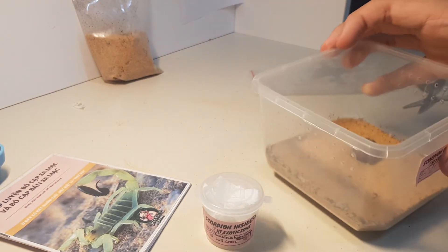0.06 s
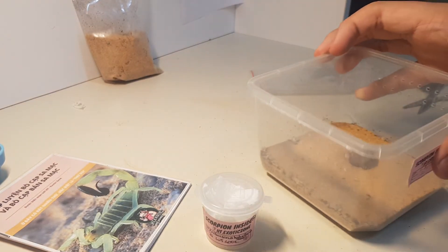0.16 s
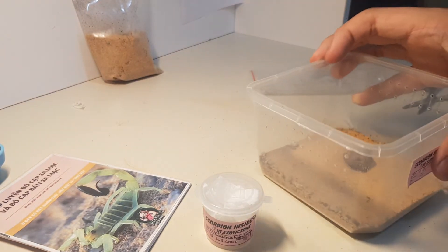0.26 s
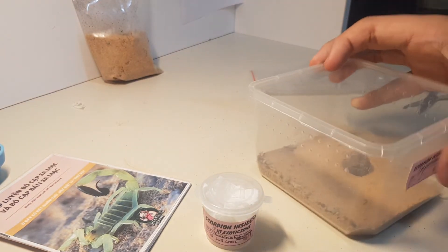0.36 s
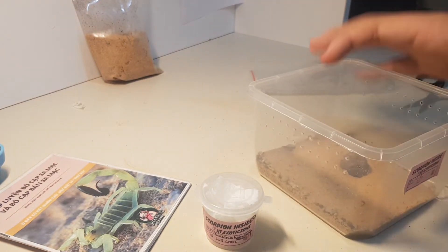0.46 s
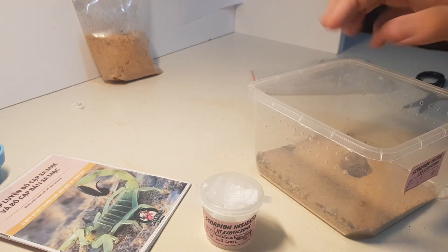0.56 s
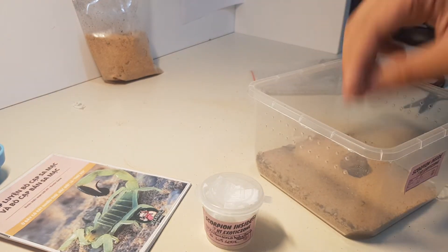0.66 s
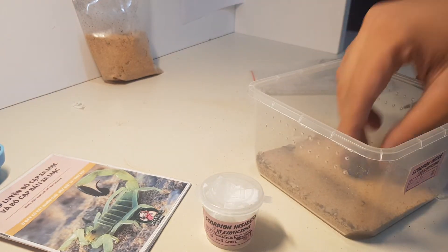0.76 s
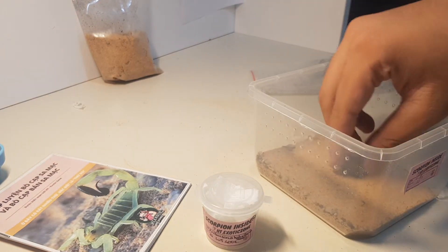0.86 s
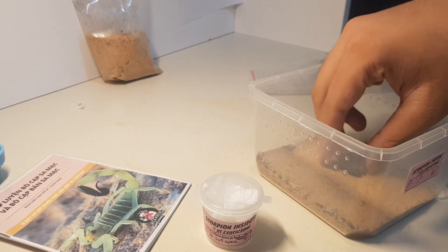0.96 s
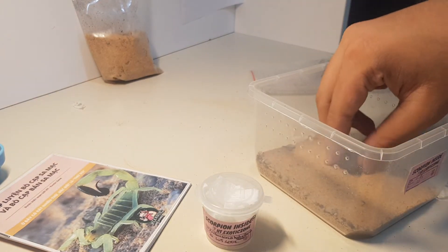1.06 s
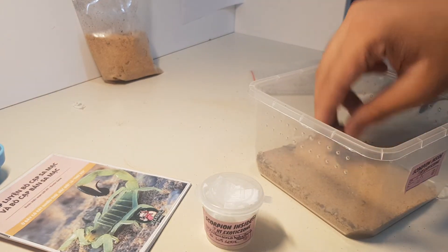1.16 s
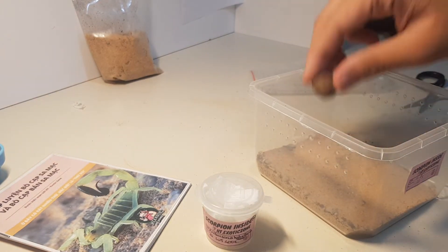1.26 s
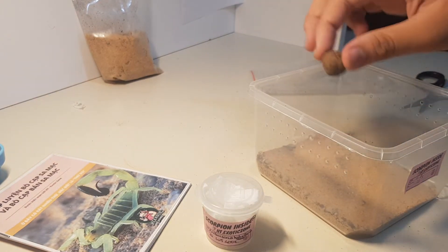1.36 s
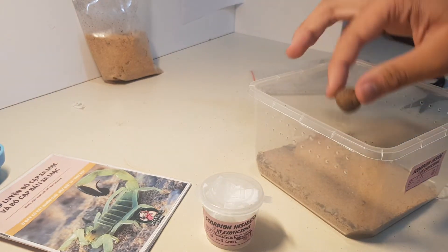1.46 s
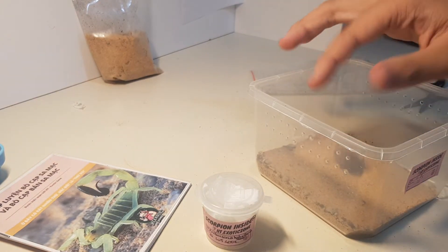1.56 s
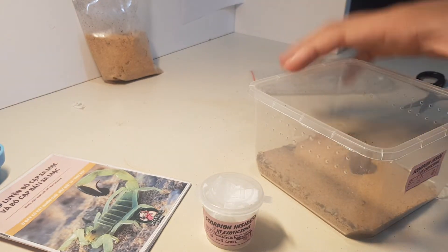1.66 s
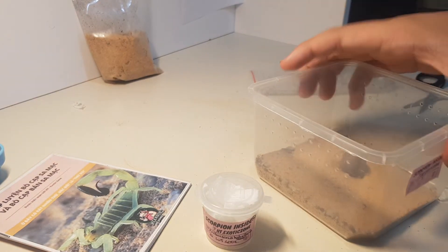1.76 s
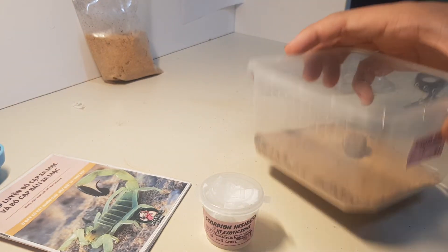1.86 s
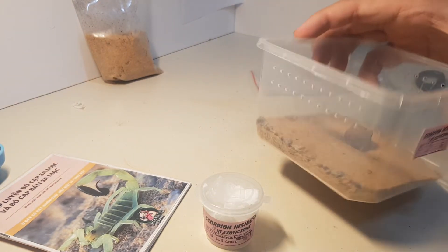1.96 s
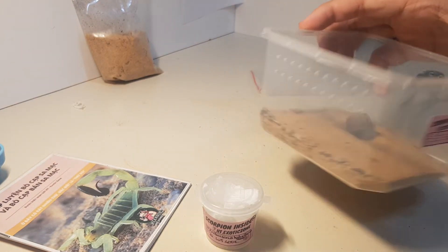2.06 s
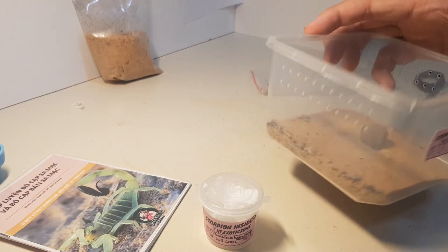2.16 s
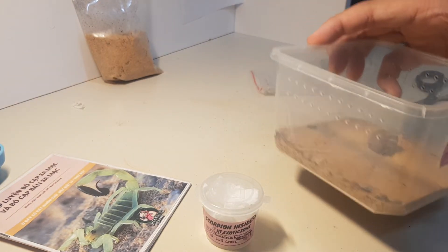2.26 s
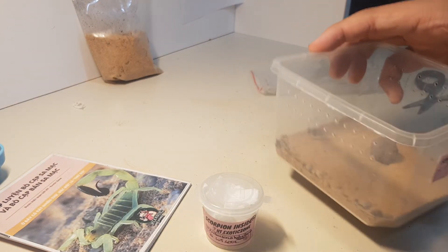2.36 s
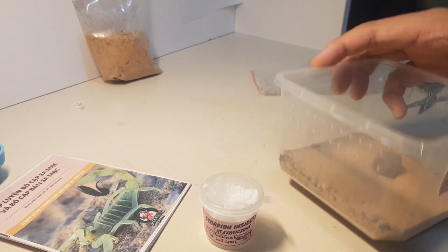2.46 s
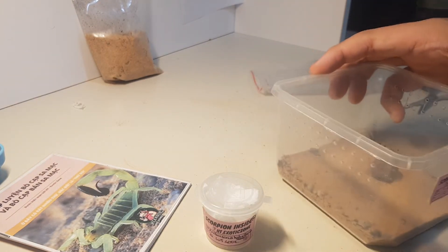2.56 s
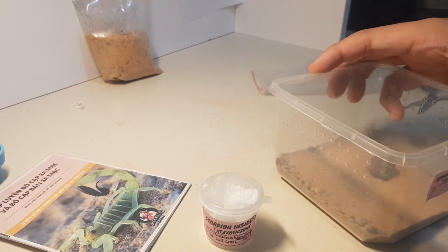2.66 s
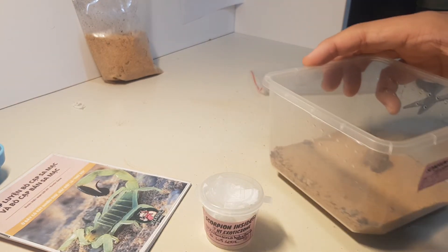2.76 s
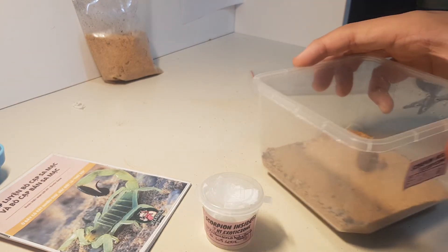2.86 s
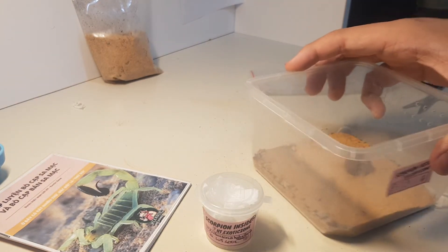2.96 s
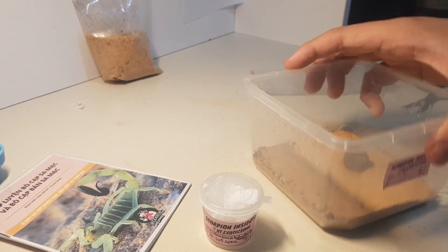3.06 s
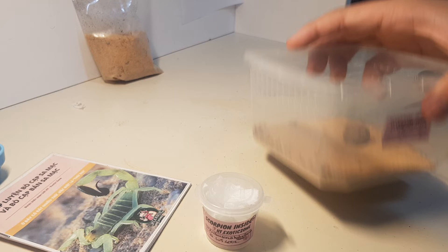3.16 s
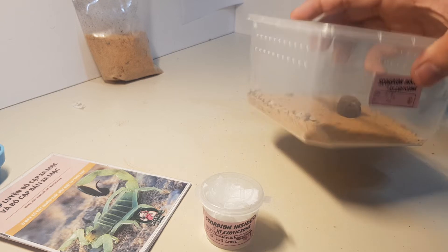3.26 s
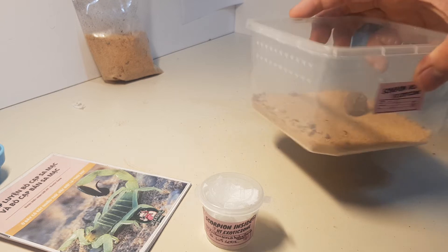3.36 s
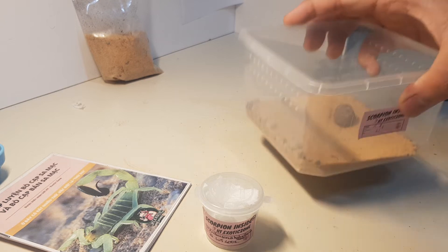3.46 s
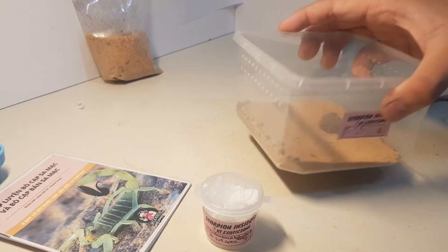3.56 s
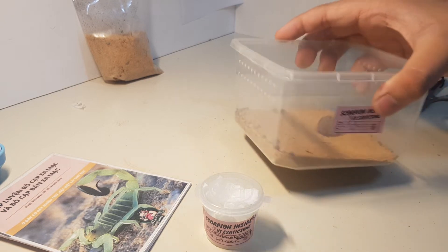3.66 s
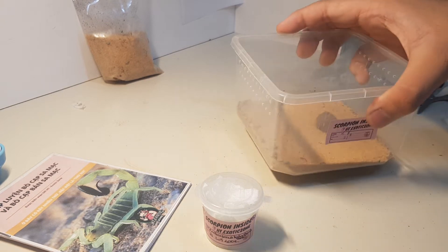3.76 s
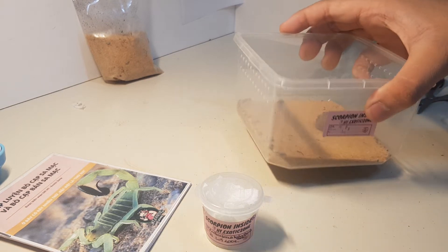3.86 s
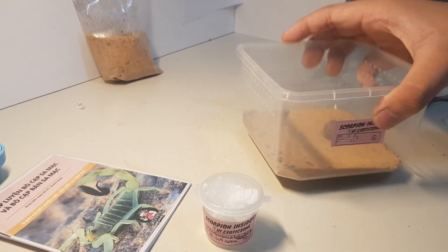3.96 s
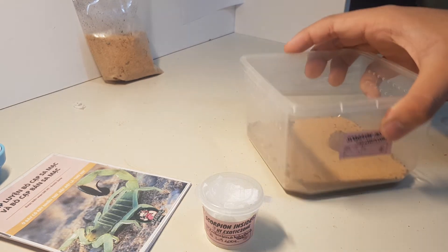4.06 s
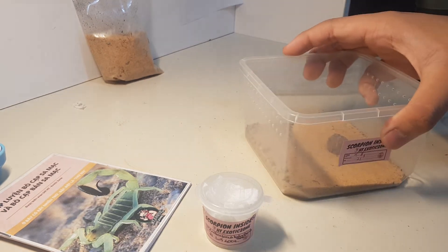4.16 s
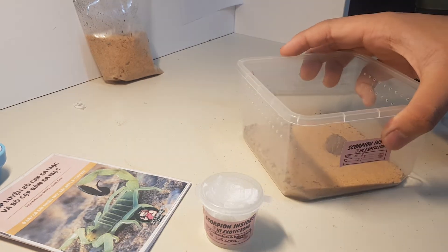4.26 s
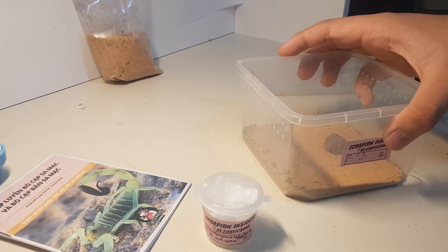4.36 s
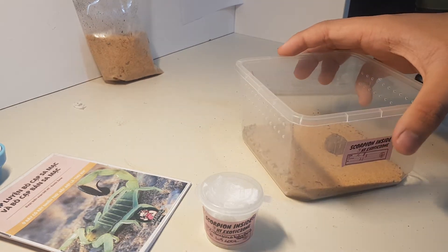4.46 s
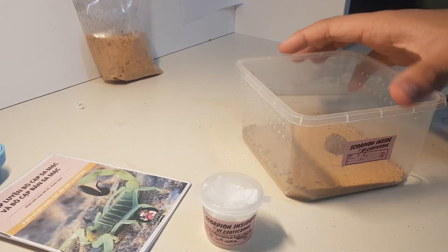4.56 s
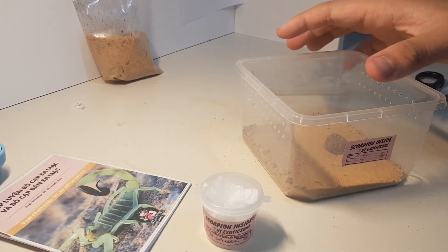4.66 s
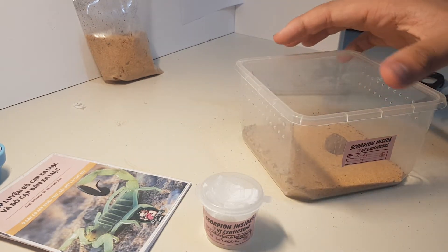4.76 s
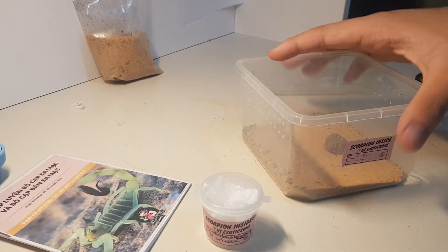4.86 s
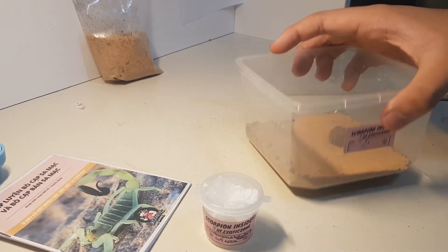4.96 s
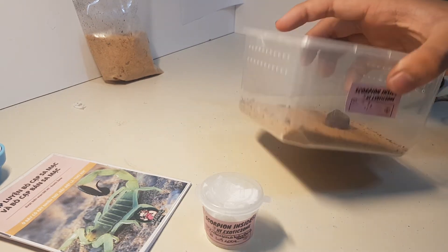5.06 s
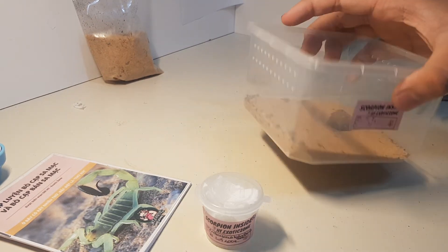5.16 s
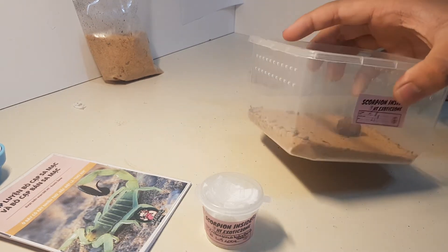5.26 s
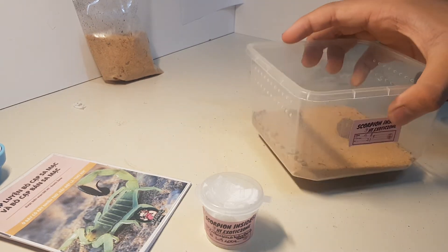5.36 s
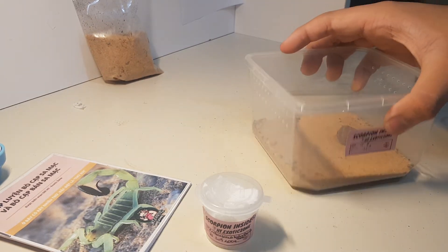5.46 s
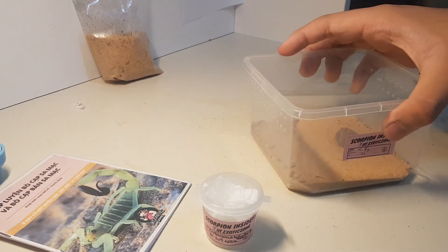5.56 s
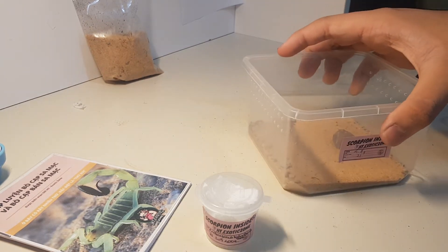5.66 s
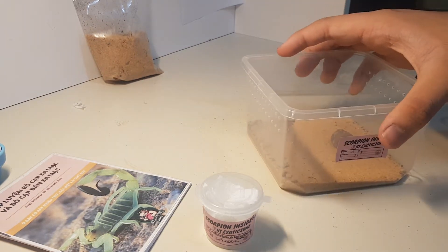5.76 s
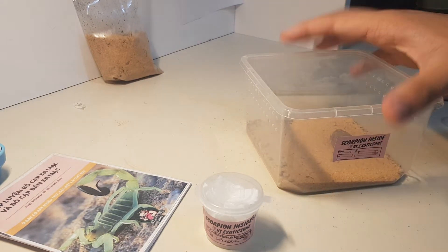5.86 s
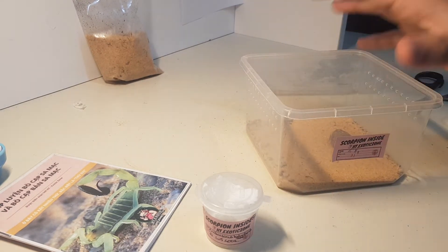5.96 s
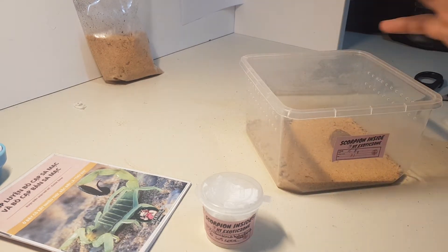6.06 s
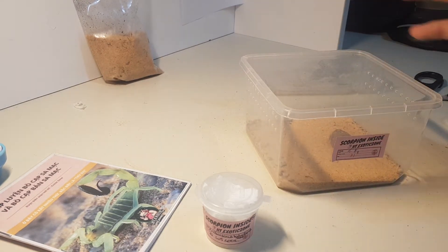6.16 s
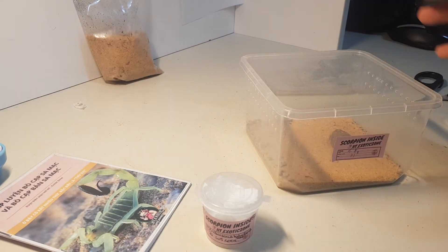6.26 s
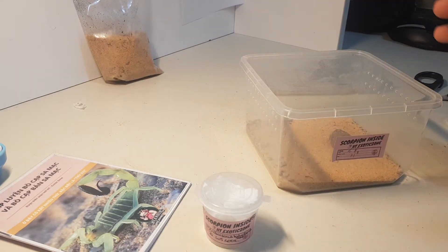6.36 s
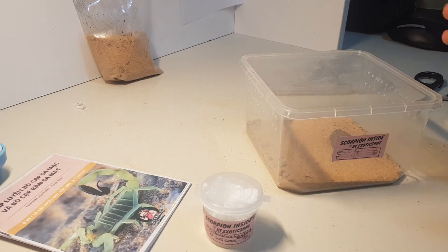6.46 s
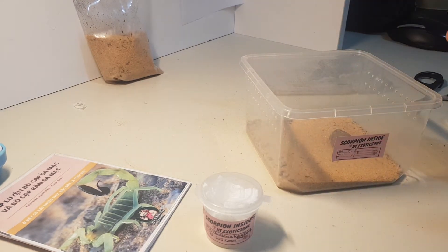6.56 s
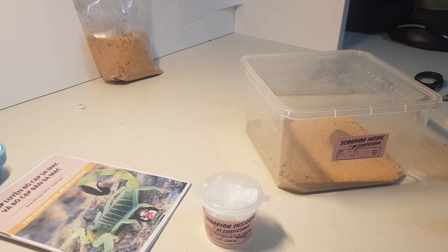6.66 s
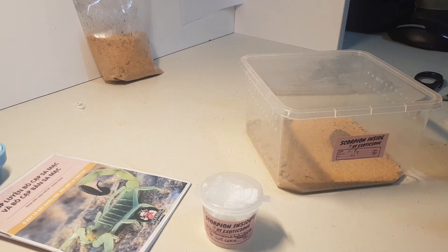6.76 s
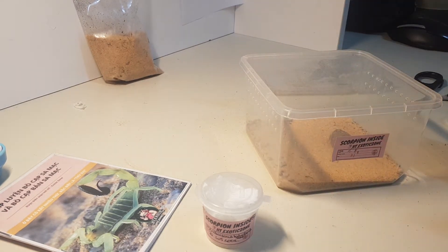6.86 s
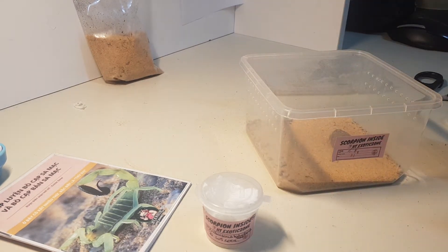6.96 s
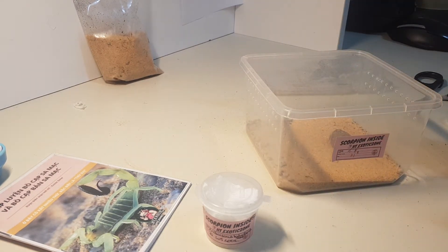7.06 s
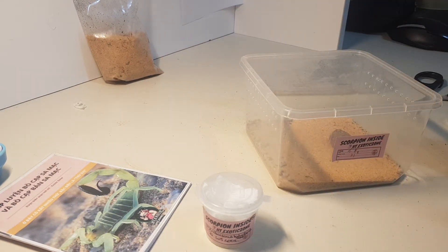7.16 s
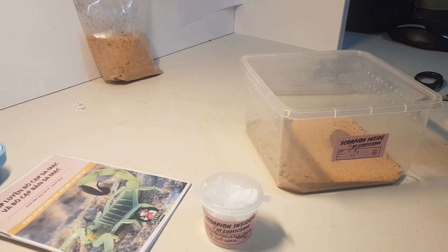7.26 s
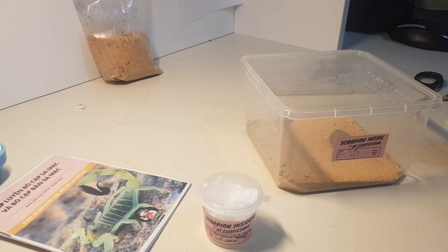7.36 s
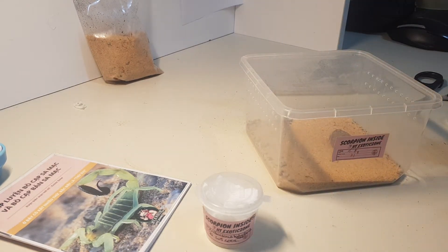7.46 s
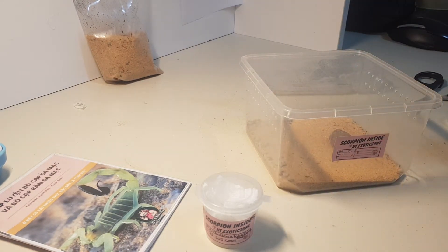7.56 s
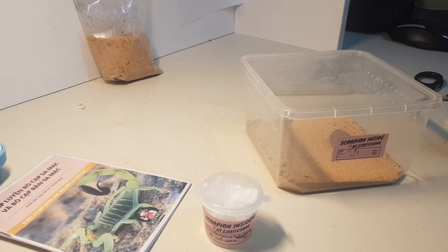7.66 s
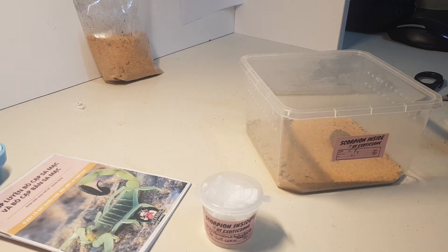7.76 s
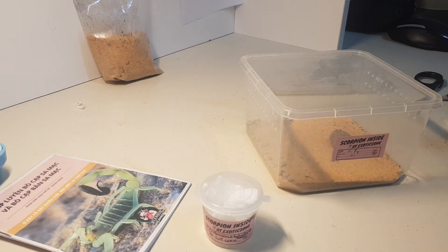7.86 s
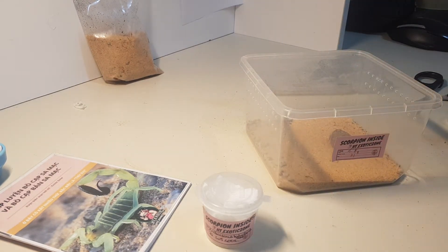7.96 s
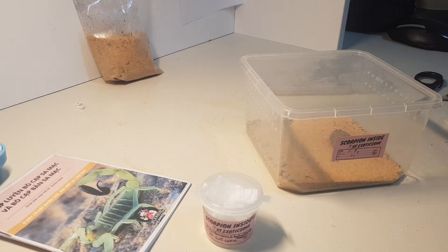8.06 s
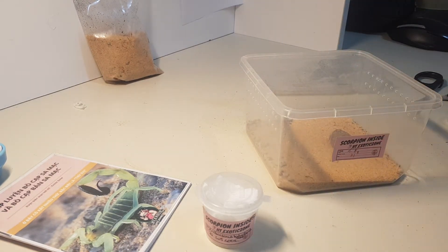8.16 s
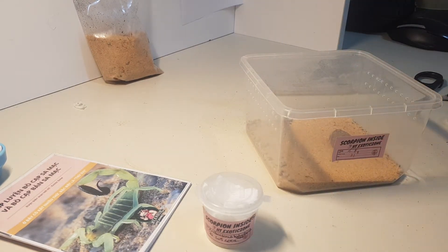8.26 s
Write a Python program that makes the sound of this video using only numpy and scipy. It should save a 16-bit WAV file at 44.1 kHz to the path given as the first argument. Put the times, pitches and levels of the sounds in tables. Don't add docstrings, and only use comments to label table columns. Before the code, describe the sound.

Small dry room, close stereo microphone. Thin plastic walls knock hollowly against a table, first in a quick cluster, then in lighter bumps with fingernail ticks, short scrapes and soft grains shifting. The sharpest double-edged clack lands late, trailed by crackly ticks. Only faint taps remain near the end, while low electrical hum, wavering fan tones and soft air noise carry on.

```python
import sys
import numpy as np
from scipy import signal
from scipy.fft import rfft, irfft, next_fast_len
from scipy.io import wavfile
from scipy.ndimage import uniform_filter1d

SR = 44100
rng = np.random.default_rng(int(sys.argv[2]) if len(sys.argv) > 2 else 0)


def materialize(psi):
    bounded = np.clip(np.atleast_2d(psi).T, -1, 1)
    quanta = np.round(bounded * 32767).astype(np.int16)
    wavfile.write(sys.argv[1], SR, quanta)


def decibels_to_gain(level_db):
    exponent = np.asarray(level_db, float) / 20
    return 10 ** exponent


N = 366459
TIME = np.arange(N) / SR
RING_TIME = TIME[:5000]
SIZE = next_fast_len(N)
BINS = np.fft.rfftfreq(SIZE, 1 / SR) + 1e-3

# pitch_hz, level_db, t60_s,
# part (rounded: 0 base, 1 worktop, 2 long wall, 3 short wall, 4 rim)
MODES = [(146, -4.5, 0.077, 0.5), (173, 0.5, 0.071, 1), (204.3, 1.5, 0.061, 1), (251, -1, 0.055, 3.5),
         (299, -5, 0.047, 2), (357.5, 2, 0.056, 1.5), (403, -1.5, 0.04, 2), (546, -3, 0.065, 3),
         (600, -3, 0.047, 2.5), (748, -5.5, 0.035, 0), (794, -3, 0.035, 0), (897, 0, 0.031, 0),
         (980, -3, 0.031, -0.5), (1074, -7.5, 0.028, 0.5), (1260, -4, 0.017, 4), (1600, -4.5, 0.017, 4),
         (1875, -3.5, 0.022, 4), (2080, -4.5, 0.016, 4), (2426, -5, 0.014, 4), (2770, -9, 0.0087, 4),
         (3120, -9, 0.014, 4), (3620, -11, 0.012, 4)]
# pitch_hz, density_db (per Hz)
SAND_BODY = [(710, -42), (1200, -4.5), (2950, -5.5), (3560, -7.5), (4300, -6), (6140, -6), (7900, -14.5),
             (10300, -69), (17400, -120)]
# pitch_hz, density_db (per Hz)
SAND_BRIGHT = [(4650, -22), (7900, -22), (8530, -14), (9000, -7), (12400, 1), (15000, -13), (16000, -20)]
# pitch_hz, likeness (0-1)
EAR_LIKENESS = [(60, 0.8), (190, .98), (290, 0.7), (640, 0.33), (1410, 0.16), (3100, 0.29), (6820, 0.12),
                (15000, 1)]


def rms_one(x):
    return x / np.sqrt(np.mean(x ** 2) + 1e-20)


def in_time(rows):
    s, *columns = np.transpose(rows)
    return [np.interp(TIME, s, c) for c in columns]


def at_hz(points, hz):
    pitch_hz, value = np.transpose(points)
    return np.interp(np.log(hz), np.log(pitch_hz), value)


def drift(rate):
    knots = int(N / SR * rate * 2) + 2
    wander = np.interp(TIME * rate * 2, np.arange(knots), rng.standard_normal(knots))
    return rms_one(uniform_filter1d(wander, int(SR / rate / 2)))


def ring(t, hz, t60):
    t = np.maximum(t, 0)
    swell = (1 - np.exp(-4 * hz * t)) ** 2
    decay = decibels_to_gain(-60 * t / np.maximum(t60, .003))
    return np.sin(2 * np.pi * hz * t) * decay * swell


def two_ears(pair, colour_db, likeness):
    # pitch_hz, left_minus_right_db
    lean = [(60, -3), (110, -1.5), (200, -1), (380, -3.5), (700, -4.5), (1290, -5.5), (2380, -4.5),
            (4400, -6), (8120, -.5), (15000, -.5)]
    mid, side = rfft(pair, SIZE) * decibels_to_gain(colour_db)
    alike = np.clip(likeness, 0, 1)
    ears = np.sqrt(1 + alike) * mid + np.sqrt(1 - alike) * side * [[1], [-1]]
    balance = decibels_to_gain(at_hz(lean, BINS) / 2 * [[1], [-1]])
    return rms_one(irfft(ears * balance, SIZE)[:, :N])


def grains(per_s, spread_db):
    sizes = decibels_to_gain(spread_db * np.minimum(rng.exponential(1, (2, N)), 5))
    sizes = sizes * rng.choice([-1, 1], (2, N))
    return sizes * (rng.random((2, N)) < per_s / SR)


def blows():
    # start_s, tub_db, worktop_db, place (0-3)
    landings = [(.26, -27, -26, 1), (.262, -26, -35.5, 1.5), (.382, -34.5, -32, 1.54),
                (.442, -32, -37, 1.6), (.447, -35, -34.5, 1.7), (1.624, -42.5, -34.5, 2.5),
                (1.747, -43, -42, 0.94), (1.753, -36, -33, 1.4), (2.986, -20.5, -25, 2.9),
                (2.999, -32, -32, 1.2), (3.035, -41, -30, 2.2), (3.066, -47, -39, 2.2),
                (4.127, -39.5, -27, 1.7), (4.165, -35, -31, 2), (4.189, -41.5, -42, 1.9),
                (5.5295, -18, -20.5, 0.83), (5.533, -27, -26, 3.0), (5.566, -43, -35, 2.2),
                (5.61, -37, -27, 2.2), (5.669, -42, -33, 1.6), (5.847, -48, -46, 1.9)]
    # start_s, tub_db, worktop_db, place (0-3)
    taps = [(.821, -40.5, -46, 1.4), (1.139, -44.5, -51, 1.8), (1.987, -49, -61, 2.0),
            (2.589, -39.5, -44, 1.8), (3.439, -50, -63, 0.05), (3.721, -41, -56, .05),
            (4.921, -41, -46, 1.84), (5.21, -41, -63, .4), (5.382, -40, -59, .05), (6.376, -42, -48, 3),
            (6.48, -43.5, -48, 3), (6.731, -44, -46, 2.2), (7.56, -43, -52, 3.1), (8.093, -45.5, -56, 3)]
    # place, base_db, long_wall_db, short_wall_db, rim_db
    places = [
        (0, 0, -21, -22, -2.5),
        (1, 0, -12.5, -11, -14),
        (2, -7.5, 0.5, -9, -14),
        (3, -10, -4.5, -1, -17),
    ]
    s, tub_db, worktop_db, place = np.transpose(sorted(landings + taps))
    spot, *shares_db = np.transpose(places)
    base, long_wall, short_wall, rim = (tub_db + np.interp(place, np.round(spot), share) for share in shares_db)
    return np.transpose([s, base, worktop_db, long_wall, short_wall, rim])


def knocks():
    hz, level_db, t60, part = np.transpose(MODES)[:, :, None]
    part = np.round(part[:, 0]).astype(int)
    out = np.zeros((2, N))
    hits = blows()
    chance = rng.standard_normal((len(hits), 5, len(hz), 1))
    for (s, *parts_db), (lag, left, right, strength, tune) in zip(hits, chance):
        gain = -decibels_to_gain(np.array(parts_db)[part, None] + level_db + 1.5 * strength + 1.8)
        at = round((s + 0.00029) * SR)
        held_hz = hz * (1 + 0.022 * tune)
        for ear, own in enumerate((left, right)):
            late_s = 0.00032 * np.abs(lag) + 0.00021 * np.abs(own) * (1 - at_hz(EAR_LIKENESS, hz))
            modes = gain * ring(RING_TIME - late_s, held_hz, t60)
            out[ear, at:at + len(RING_TIME)] += np.sum(modes, axis=0)
    return out * decibels_to_gain([[-1.2], [1.2]])


def pings():
    # start_s, pitch_hz, peak_db,
    # t60_s, left_minus_right_db
    single_rings = [(1.028, 5660, -48, .015, -7), (3.74, 940, -46, .04, 4), (3.79, 990, -43, 0.037, 0),
                    (4.541, 3850, -44.5, 0.013, -16), (4.557, 3620, -43, .02, -10),
                    (5.149, 925, -44.5, 0.06, -5), (5.853, 3240, -38.5, 0.019, -13),
                    (6.364, 600, -40, 0.11, 0), (6.39, 590, -36.5, 0.097, 2), (6.41, 600, -40, .08, -2),
                    (6.375, 370, -38, 0.08, -3), (6.733, 372, -33, 0.061, -6), (6.734, 7000, -45.5, .015, 6),
                    (1.141, 355, -36, .07, -4), (1.135, 185, -39, .08, -1), (1.208, 870, -45, .04, -2),
                    (6.42, 138, -38, .12, 0), (6.755, 134, -37, .12, 0), (7.56, 545, -43, .05, -2),
                    (7.848, 560, -46, .03, -2), (7.85, 132, -39, .1, 0), (5.74, 150, -38, .15, 0),
                    (5.6695, 2000, -36, .015, 0), (5.5305, 1450, -29, .035, -3), (5.679, 190, -34, .07, -1),
                    (3.012, 700, -34, .05, -2), (5.541, 1900, -35, .05, -3), (5.548, 1450, -37, .04, -3),
                    (5.636, 3000, -38, .02, -3), (6.372, 600, -40, .04, 0),
                    (.2608, 898, -20.5, .032, -3), (.261, 1900, -35, 0.034, -3), (.2625, 615, -28, 0.032, -1),
              (0.4424, 366, -22, 0.057, -6), (0.4451, 368, -19.5, .075, -6), (0.4414, 950, -23.5, .022, -2),
              (.4425, 2000, -31, .015, -2), (.449, 780, -25, 0.042, -2), (.451, 580, -27, .06, -5),
              (.8195, 504, -36, .04, -6), (.832, 150, -36, .05, -1), (2.589, 394, -28, .055, -9),
              (2.595, 160, -38, .06, -1), (5.53, 920, -13, 0.022, -3), (5.53, 600, -18.5, 0.037, -3),
              (5.531, 1900, -29, .03, -5), (5.5315, 2370, -32, .03, -3), (5.532, 3050, -34, .025, -5),
              (5.531, 380, -25, 0.046, -4), (2.9865, 994, -23, .05, -2), (2.988, 1350, -33, .03, -2),
              (3.004, 974, -30, 0.057, -2), (1.745, 960, -31, .06, -2), (1.756, 900, -32, 0.056, -2),
              (1.783, 910, -38, 0.085, -2), (1.636, 190, -34, 0.088, -1), (1.762, 190, -31, .1, -1),
              (2.997, 2000, -37, .02, -2), (3.007, 2000, -34, .03, -2), (3.036, 2900, -35, .012, -4),
              (4.1655, 930, -32, .03, -2)]
    t = TIME[:4000] - [[0.00015], [0]]
    out = np.zeros((2, N))
    for s, hz, peak_db, t60, pan_db in single_rings:
        at = round(s * SR)
        sides_db = peak_db + np.array([[pan_db], [-pan_db]]) / 2
        out[:, at:at + 4000] -= decibels_to_gain(sides_db) * ring(t, hz, t60)
    return out


def ticks():
    # start_s, peak_db, top_share_db, left_minus_right_db
    finger_ticks = [(0.2606, -44.5, -30, -1), (0.3811, -34, -16, -1), (0.438, -44, -18, 2),
                    (0.4425, -36, -16, 2), (.4627, -44, -21, -6), (.486, -47, -16, 1), (1.081, -43, -15, 2),
                    (1.115, -47, -18, -3), (1.1295, -42, -15, 1), (1.6244, -50.5, -28, -5),
                    (1.7479, -45, -17, 2), (2.252, -49, -25, -3), (2.587, -49, -26, -1),
                    (2.9863, -42, -18, 2), (3.0027, -41, -13, 5), (3.0362, -33, -12, 3),
                    (3.0658, -38, -13, 1), (3.412, -46, -22, -2), (3.468, -40, -33, 3),
                    (4.128, -50.5, -30, -7), (3.721, -50, -20, 0), (4.171, -50, -17, 0),
                    (4.1837, -48.5, -14, 7), (4.9257, -33, -15.5, 1), (5.1149, -54, -12, 0),
                    (5.3414, -42.5, -31, 2), (5.5297, -36, -33, -1), (5.537, -44, -16, 0),
                    (5.636, -35.5, -17, -5), (5.6536, -33, -15, 0), (5.669, -30.5, -13, 5),
                    (5.7016, -45, -15, 3), (5.725, -46, -20, 0), (5.797, -52, -16, 0), (5.85, -48, -16, -3),
                    (6.3755, -43, -31, 6), (6.733, -45, -13, 4)]
    t60_s = 0.031
    low = two_ears(rng.standard_normal((2, N)), at_hz(SAND_BODY, BINS), 0.11)
    high = two_ears(rng.standard_normal((2, N)), at_hz(SAND_BRIGHT, BINS), 0.06)
    out = np.zeros((2, N))
    for s, peak_db, top_db, pan_db in finger_ticks:
        at = round(s * SR)
        span = slice(at, at + 4000)
        fall = decibels_to_gain(peak_db - 2.5 - 60 * TIME[:4000] / t60_s)
        crack = low[:, span] + decibels_to_gain(top_db + 12) * high[:, span]
        out[:, span] += fall * decibels_to_gain([[pan_db / 2], [-pan_db / 2]]) * crack
    return out


def strokes():
    # start_s, length_s, drag_db, sand_db
    drags = [(0.258, 0.14, -42, -62.5), (1.087, 0.13, -50.5, -62.5), (1.623, 0.037, -41.5, -66),
             (1.801, 0.069, -46, -60), (2.58, .06, -51, -67), (2.99, 0.056, -32.5, -49),
             (3.035, .09, -39.5, -59), (4.142, .11, -40, -64), (5.537, 0.063, -37, -63),
             (5.634, 0.045, -33, -44), (5.687, 0.06, -43.5, -57), (5.733, 0.22, -48, -63.5),
             (6.745, 0.093, -46.5, -66), (6.396, 0.067, -48.5, -80), (7.84, 0.05, -50, -95)]
    # start_s, length_s, rub_db, sand_db
    rubs = [(0.396, 0.06, -44.5, -59.5), (.43, 0.088, -43.5, -63), (0.513, .085, -45.5, -65),
            (0.464, 0.051, -45.5, -66), (1.016, 0.056, -53.5, -62), (1.725, .024, -55, -65),
            (1.741, .069, -38, -43.5), (3.428, 0.09, -45.5, -62.5), (4.01, 0.06, -46.5, -73),
            (4.922, 0.072, -50.5, -58), (6.365, .1, -51.5, -67), (6.467, .062, -49, -72),
            (7.54, .089, -57, -78), (8.05, .1, -54, -95), (5.536, 0.083, -42.5, -70), (3.7, .1, -58, -77),
            (5.684, .03, -47, -62), (6.53, .2, -56, -90), (5.385, .04, -53, -75), (1.2, .04, -53, -80)]
    # start_s, length_s, sand_db
    slides = [(.805, .13, -62.5), (2.052, .092, -64), (2.14, 0.19, -64.5), (3.298, 0.17, -65.5),
              (3.695, .12, -66.5), (5.102, 0.17, -67), (5.3, 0.16, -63)]
    drag_dull_db, drag_in_tub_db, rub_in_worktop_db, slide_in_body_db = -3, -8, -6, -5
    top_db, brighter_with_force = -13.5, .3
    rows = [(s, length, sand, drag_dull_db, db, db + drag_in_tub_db) for s, length, db, sand in drags]
    rows += [(s, length, sand, 0, db + rub_in_worktop_db, db) for s, length, db, sand in rubs]
    rows += [(s, length, sand, 0, sand + slide_in_body_db, sand + slide_in_body_db)
             for s, length, sand in slides]
    return [(s, length, sand, sand + top_db + dull + brighter_with_force * (sand + 50), drag, rub)
            for s, length, sand, dull, drag, rub in rows]


def handling():
    levels = np.zeros((4, N))
    for s, length, *levels_db in strokes():
        along = np.arange(0, 1, 1 / (length * SR))
        swell = np.minimum(along / 0.094, 1) * (1 - along ** 5.3)
        at = round(s * SR)
        levels[:, at:at + len(along)] += decibels_to_gain(np.array(levels_db))[:, None] * swell
    hiss, top, drag, rub = levels
    unevenness = decibels_to_gain(2.7 * drift(40))
    out = hiss * unevenness * two_ears(grains(3000, 3.0), at_hz(SAND_BODY, BINS), .2)
    out += top * decibels_to_gain(10.5) * unevenness * two_ears(grains(7000, 2.8), at_hz(SAND_BRIGHT, BINS), 0.15)
    hz, level_db, t60, part = np.transpose(MODES)[:, :, None]
    part = np.round(part[:, 0])
    rings = decibels_to_gain(level_db) * ring(RING_TIME, hz, t60)
    worktop, tub = part == 1, np.isin(part, (0, 2, 3, 4))
    for level, body, clicks_per_s in ((drag, worktop, 300), (rub, tub, 1200)):
        body_ring = rings[body].sum(axis=0, keepdims=True)
        rung = signal.fftconvolve(grains(clicks_per_s, 2.5), body_ring, axes=1)[:, :N]
        out += level * two_ears(rung, 0, at_hz(EAR_LIKENESS, BINS))
    return out


def room(x):
    t60_s, cut_hz = 0.35, 4400
    w = 2 * np.pi * BINS / SR
    dull = 1 / (1 + 1j * BINS / cut_hz)
    echoes = np.zeros((2, len(w)), complex)
    for k, lag in enumerate(rng.uniform(.008, .035, 8) * SR):
        loop = decibels_to_gain(-60 * lag / SR / t60_s) * dull * np.exp(-1j * w * round(lag))
        echoes[k % 2] += loop / (1 - loop) * (-1) ** (k // 2)
    return irfft(rfft(x, SIZE) * echoes, SIZE)[:, :N]


def tones(hz, partials, wobble, lead=0):
    turn = 2 * np.pi * (hz * TIME + lead + wobble * drift(1.51))
    return sum(np.sqrt(2) * decibels_to_gain(db) * np.cos(round(k) * turn) for k, db in partials)


def appliances():
    # multiple, level_db
    mains_partials = [(2, -55), (4, -56.5), (6, -69)]
    rotor_partials = [(1, -72)]
    fan_partials = [(1, 2), (2, -8), (5, -14)]
    # time_s, lost_cycles, rotor_db
    slips = [(0, 0, -58), (.38, 1.0, -60), (.95, 1.5, -69), (1.55, 3.0, -60), (2.5, 5.5, -72),
             (3.07, 7.0, -57), (5.17, 12.0, -59), (5.65, 14, -82), (6.22, 14.0, -61), (6.55, 15.0, -75),
             (7.25, 17.0, -67), (8.5, 20.0, -62)]
    # time_s, first_db, second_db
    fan_levels = [(0, -72, -75), (1.0, -67, -72), (1.15, -59.5, -59), (2.5, -59.5, -58.5), (3.5, -60, -61),
                  (4.5, -62, -63), (6, -60, -63), (7, -59, -64), (8.31, -60, -62)]
    # time_s, gained_cycles
    fan_wander = [(0, -.5), (1.2, -.49), (2.0, .17), (2.5, .24), (3.8, 0), (4.9, .14), (5.8, -.1),
                  (7.2, -.98), (8.31, -.62)]
    # time_s, level_db
    far_engine = [(0, -53), (.3, -66), (.6, -75), (.95, -55), (1.4, -69), (2.0, -69), (2.31, -59),
                  (2.93, -56), (3.1, -67), (4.2, -57), (4.6, -68), (6.0, -70), (6.6, -68), (7.2, -85),
                  (7.77, -64.5), (8.31, -63)]
    mains_hz, rotor_hz, whine_hz, whine_db = 50, 48.8, 458, -71
    fan_hz, partner_hz, partner_lead_cycles = 357.65, 373.905, 0.3

    motor = tones(mains_hz, mains_partials, 0) + tones(rotor_hz, rotor_partials, 0.087)
    behind, rotor_db = in_time(slips)
    motor += np.sqrt(2) * decibels_to_gain(rotor_db) * np.cos(2 * np.pi * (2 * mains_hz * TIME - behind))

    first_db, second_db = in_time(fan_levels)
    gained, = in_time(fan_wander)
    fans = decibels_to_gain(first_db + 0.5 * drift(2.7)) * tones(fan_hz, fan_partials, 0.011, gained)
    partner = tones(partner_hz, [(1, 0)], 0.02, gained + partner_lead_cycles)
    fans = fans + decibels_to_gain(second_db + 1.5 * drift(3.8)) * partner
    fans = fans + np.sqrt(2) * decibels_to_gain(whine_db) * np.cos(2 * np.pi * whine_hz * TIME)

    engine_hz = 57.5 + 2.06 * drift(3.0)
    engine_db, = in_time(far_engine)
    engine = np.sqrt(2) * decibels_to_gain(engine_db) * np.sin(2 * np.pi * np.cumsum(engine_hz) / SR)
    return motor + engine + fans * decibels_to_gain([[-2.1], [2.1]])


def room_air():
    # pitch_hz, density_db (per Hz)
    air_colour = [(25, -26), (33, -22), (45, -8), (80, -10), (120, -1), (250, -3), (420, -4), (620, -13),
                  (1000, -12), (2000, -18), (2500, -22), (6500, -25), (7600, -33), (9000, -60)]
    # pitch_hz, width_hz, level_db
    air_peaks = [(150, 8.1, 3), (200, 7, 2), (257, 8, -0.5), (290, 150, -4), (320, 30, -3), (500, 70, -4),
                 (600, 60, -4), (817, 47, 8.5), (953, 69, 3), (1148, 160, -6), (1585, 220, 4),
                 (1808, 180, 7), (1980, 120, 2), (2150, 200, -3.5), (4440, 570, 3.5)]
    # time_s, level_db
    air_swell = [(0, 0), (1.0, -1), (2.9, -1), (3.6, 0), (5.3, -.3), (5.9, .8), (6.8, .8), (7.3, 0),
                 (8.31, 0)]
    # pitch_hz, density_db (per Hz)
    hiss_colour = [(6000, -30), (8000, -8), (9500, -4), (12500, 0), (15400, -4), (15900, -30)]
    air_db, hiss_db = -52 + 1.44, -72
    bumps_db = sum(db / (1 + (2 * (BINS - hz) / width) ** 2) for hz, width, db in air_peaks)
    colour_db = at_hz(air_colour, BINS) + bumps_db
    air = two_ears(rng.standard_normal((2, N)), colour_db, at_hz(EAR_LIKENESS, BINS))
    hiss = two_ears(rng.standard_normal((2, N)), at_hz(hiss_colour, BINS), 0)
    return decibels_to_gain(air_db + in_time(air_swell)[0]) * air + decibels_to_gain(hiss_db) * hiss


def scene():
    room_db, low_cut_hz = -19.5, 125
    hits = knocks() + ticks() + pings()
    tub = hits + decibels_to_gain(room_db) * room(hits.mean(axis=0)) + handling()
    tub = signal.sosfilt(signal.butter(3, low_cut_hz, "high", fs=SR, output="sos"), tub)
    return tub + room_air() + appliances()


def band_limit(x):
    return signal.sosfilt(signal.butter(12, 16620, fs=SR, output="sos"), x)


def record(dry):
    cut = signal.sosfilt(signal.cheby2(10, 50, 16700, fs=SR, output="sos"), dry)
    return band_limit(cut)


dry = scene()
out = record(dry)
materialize(out)
```